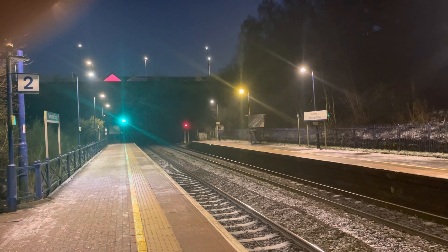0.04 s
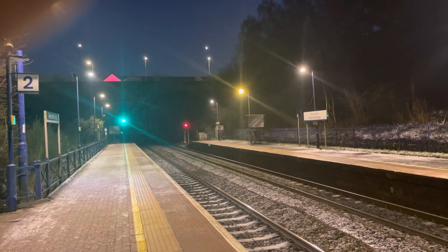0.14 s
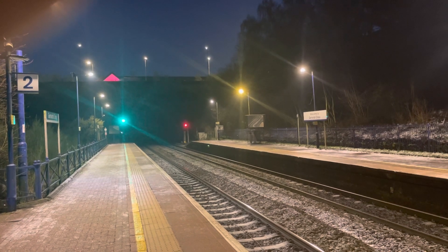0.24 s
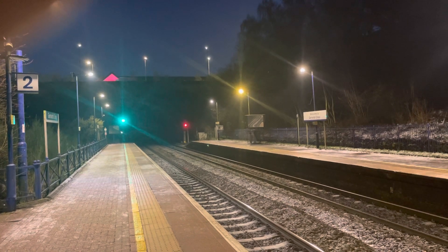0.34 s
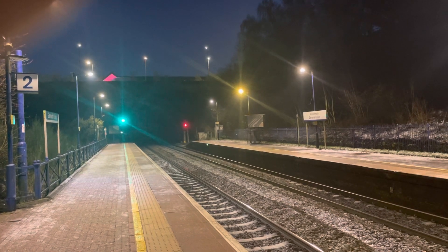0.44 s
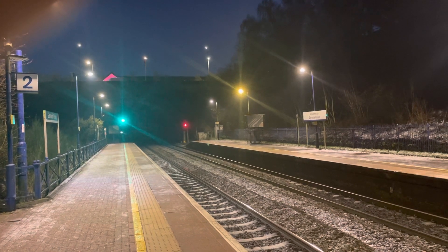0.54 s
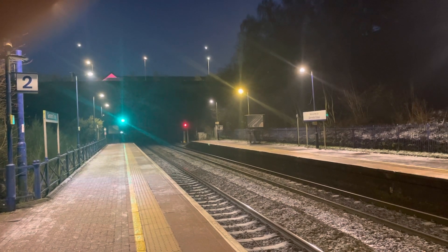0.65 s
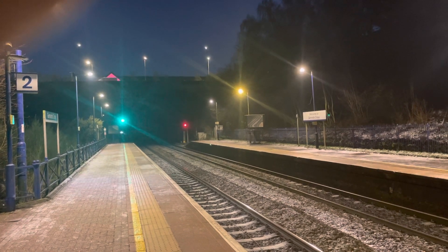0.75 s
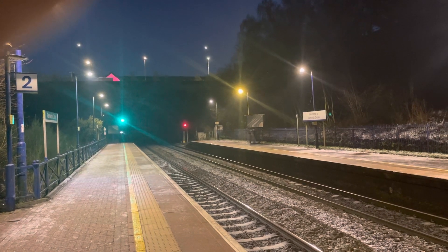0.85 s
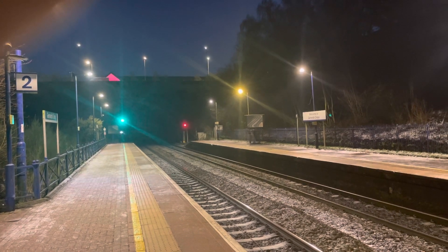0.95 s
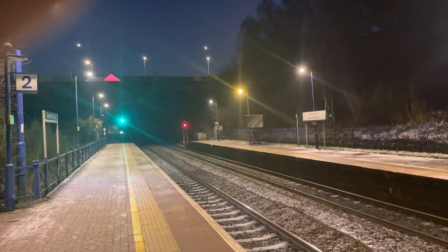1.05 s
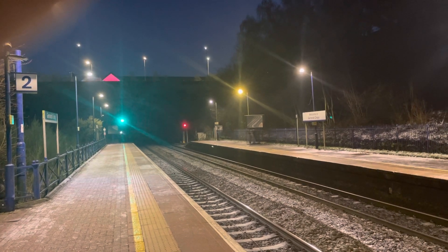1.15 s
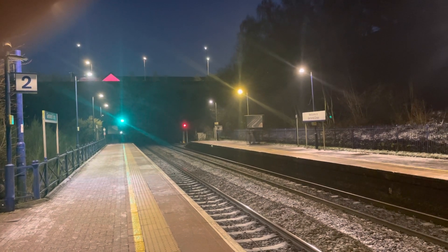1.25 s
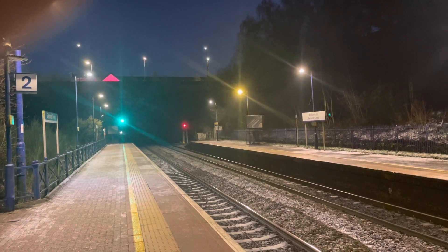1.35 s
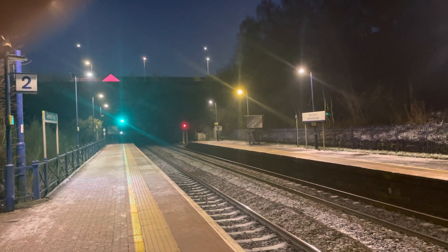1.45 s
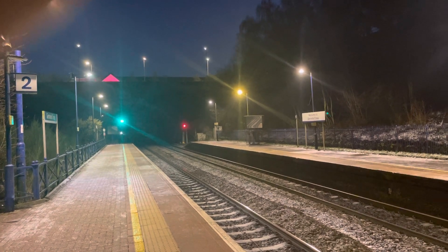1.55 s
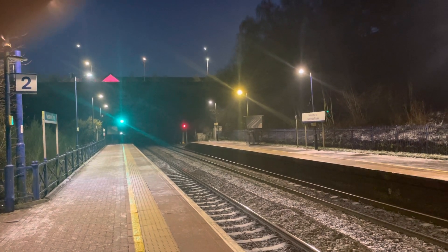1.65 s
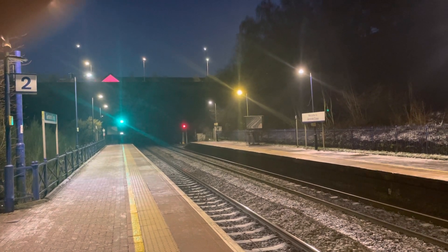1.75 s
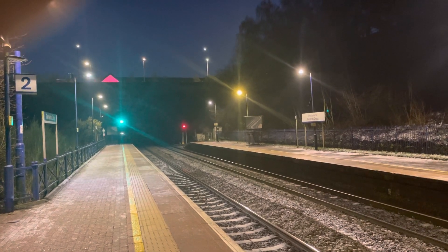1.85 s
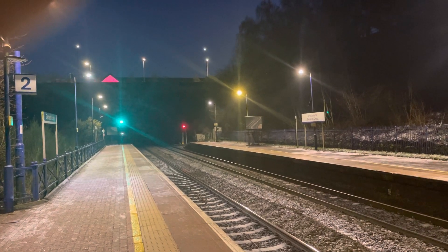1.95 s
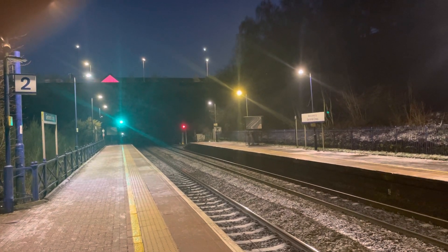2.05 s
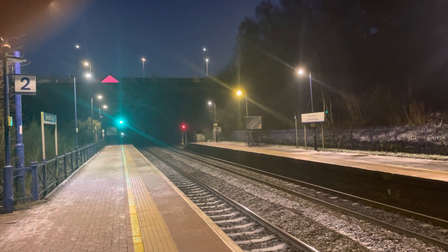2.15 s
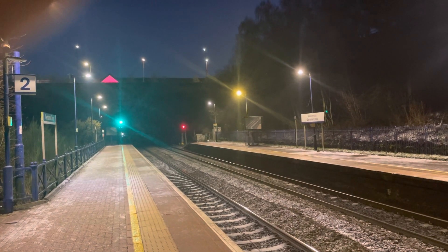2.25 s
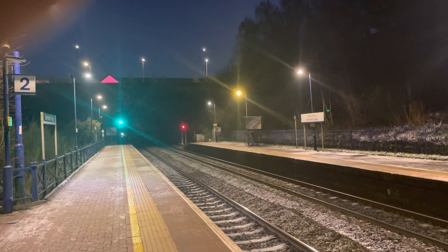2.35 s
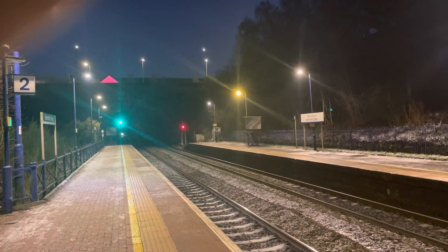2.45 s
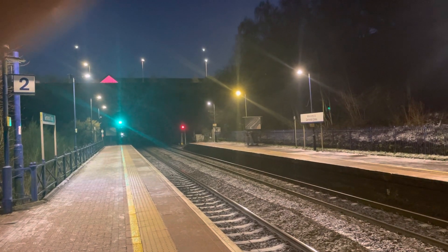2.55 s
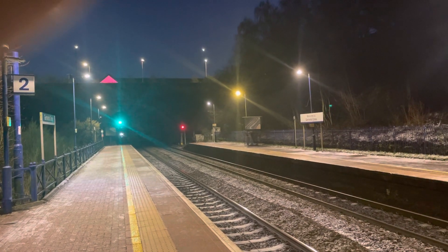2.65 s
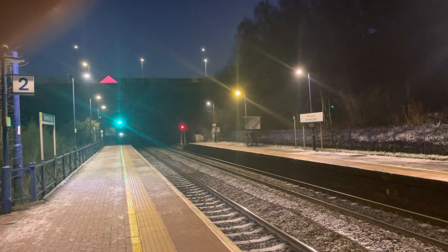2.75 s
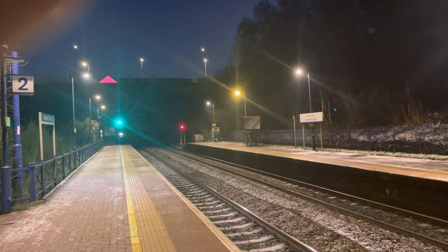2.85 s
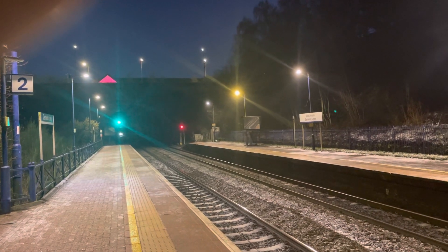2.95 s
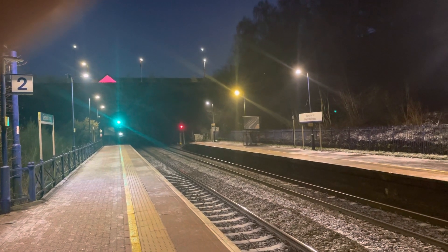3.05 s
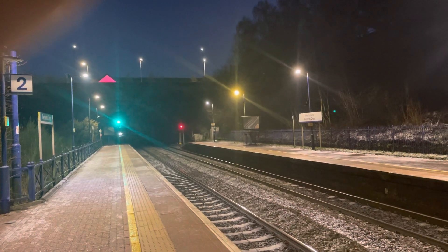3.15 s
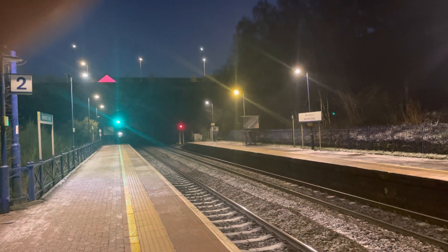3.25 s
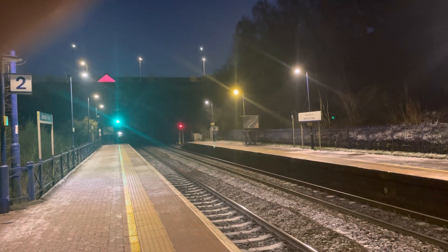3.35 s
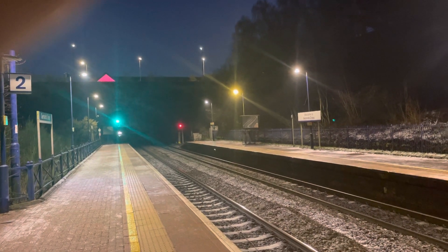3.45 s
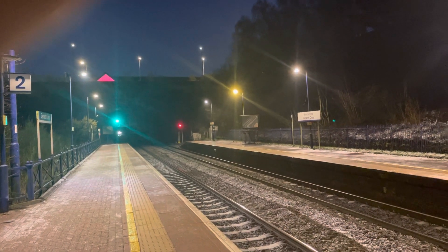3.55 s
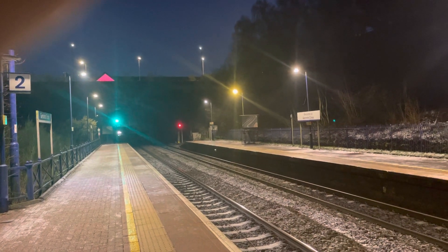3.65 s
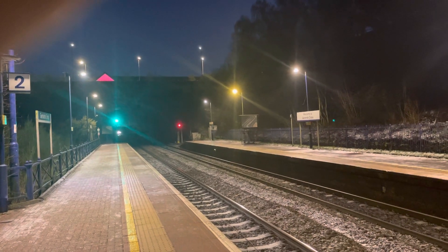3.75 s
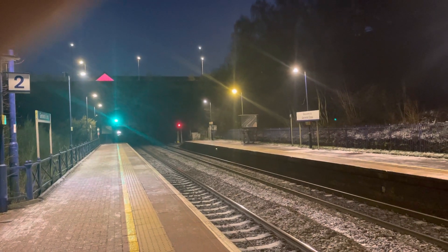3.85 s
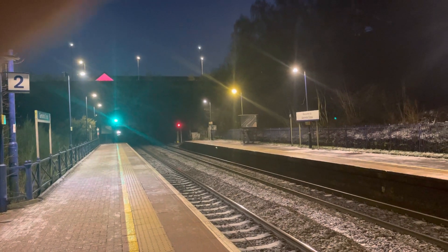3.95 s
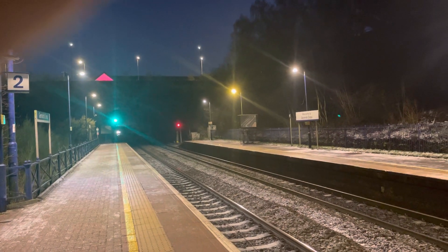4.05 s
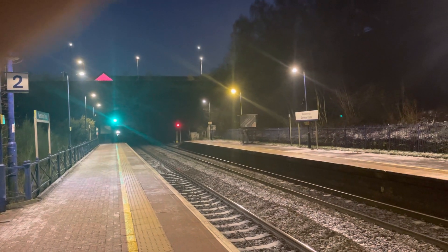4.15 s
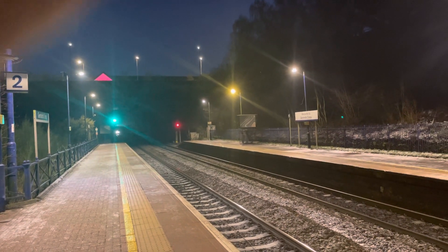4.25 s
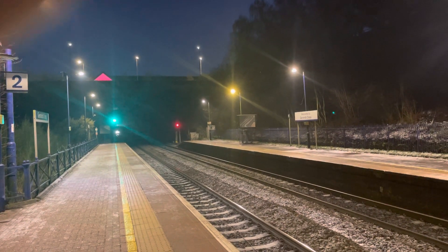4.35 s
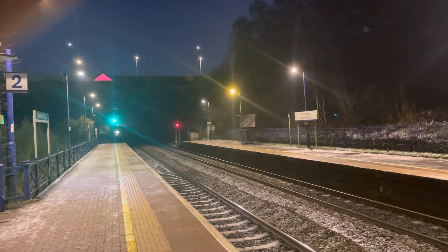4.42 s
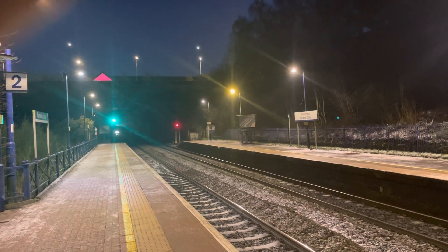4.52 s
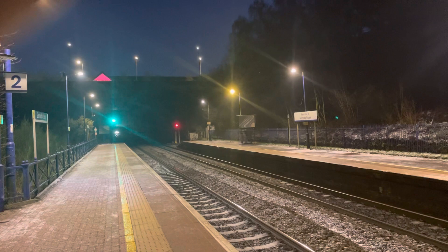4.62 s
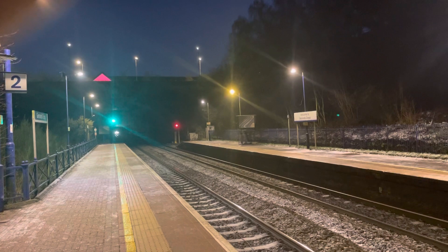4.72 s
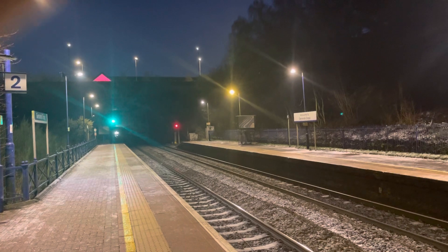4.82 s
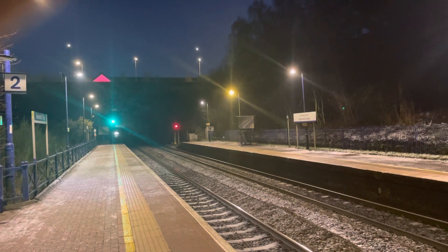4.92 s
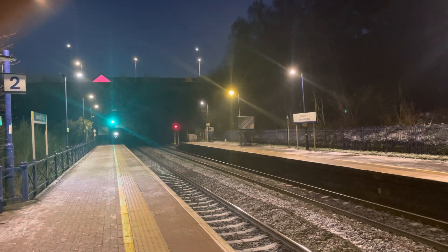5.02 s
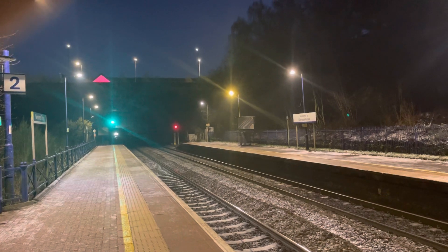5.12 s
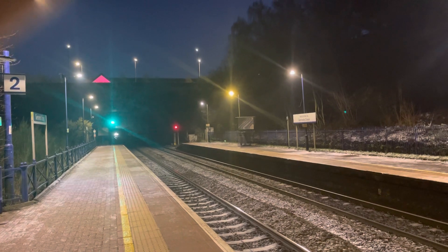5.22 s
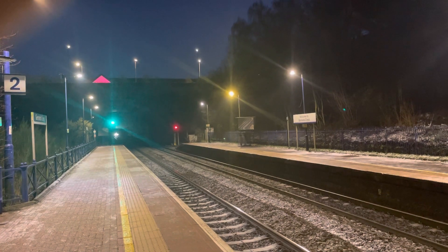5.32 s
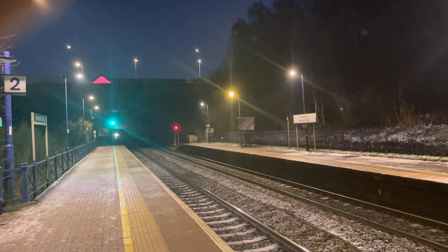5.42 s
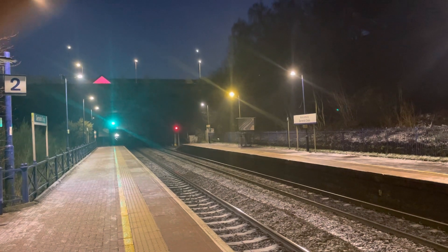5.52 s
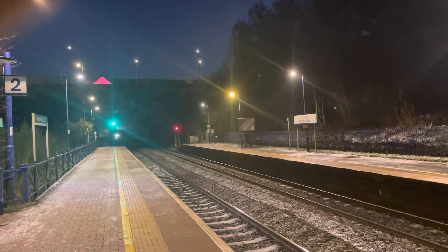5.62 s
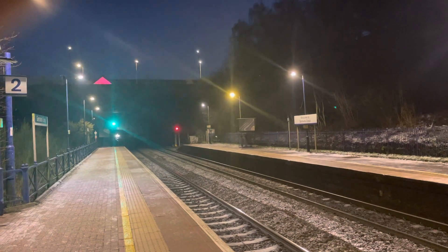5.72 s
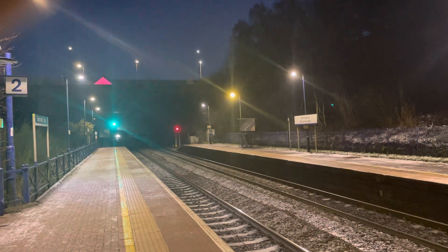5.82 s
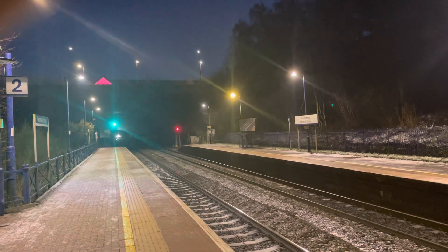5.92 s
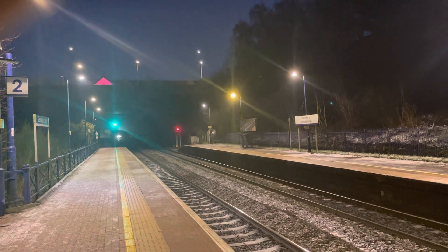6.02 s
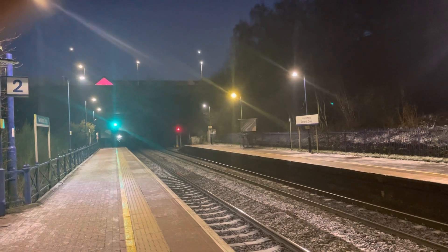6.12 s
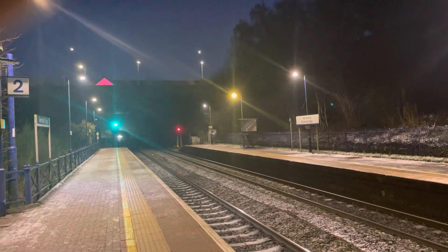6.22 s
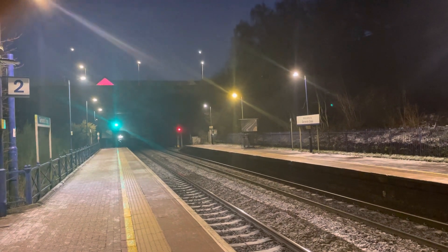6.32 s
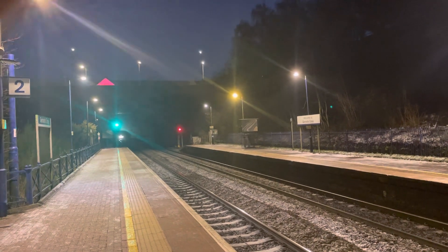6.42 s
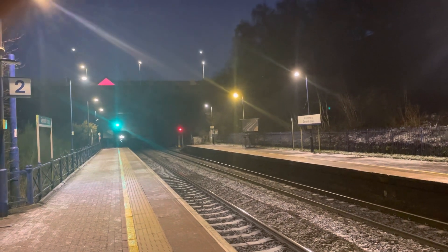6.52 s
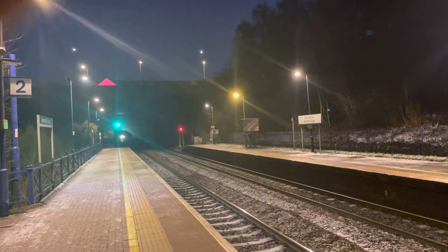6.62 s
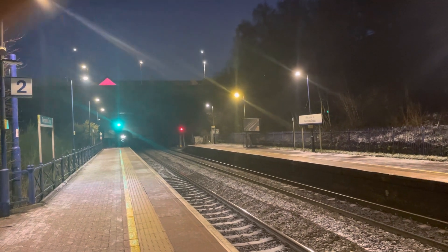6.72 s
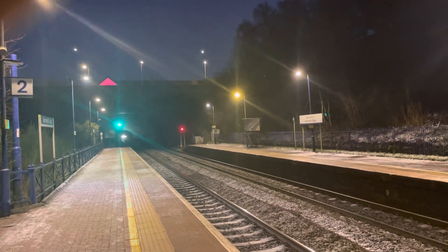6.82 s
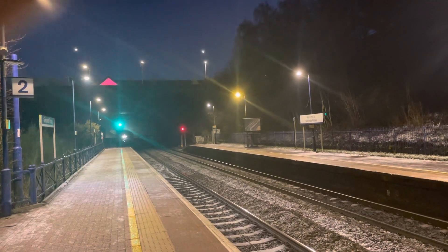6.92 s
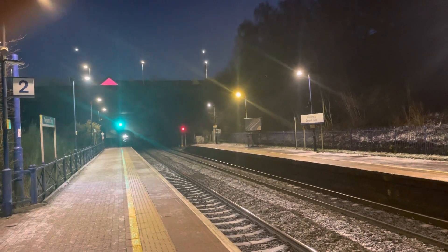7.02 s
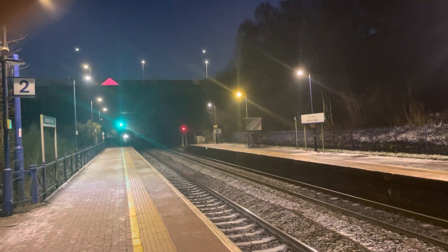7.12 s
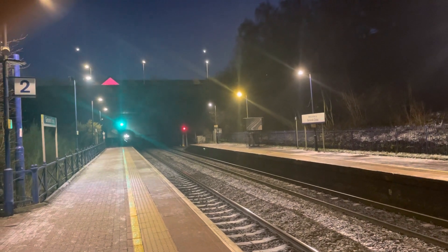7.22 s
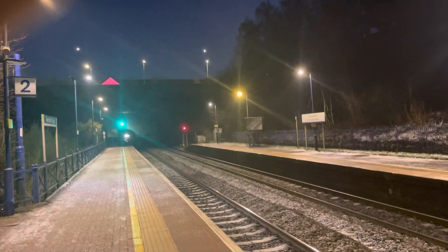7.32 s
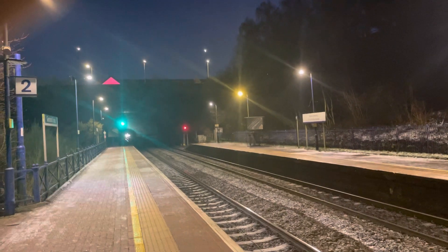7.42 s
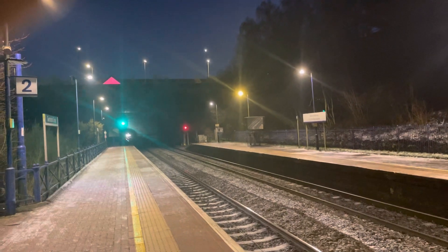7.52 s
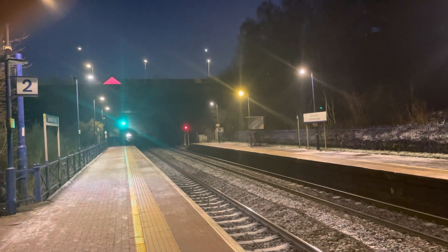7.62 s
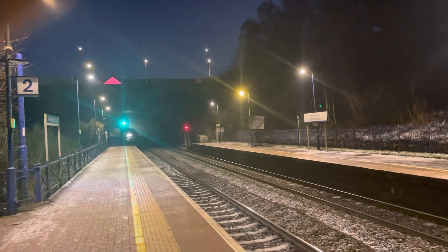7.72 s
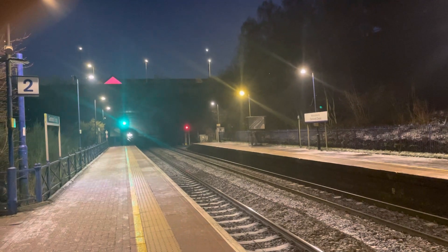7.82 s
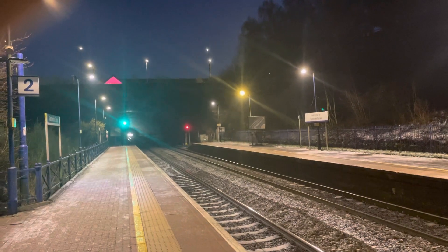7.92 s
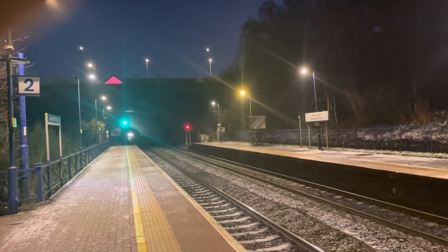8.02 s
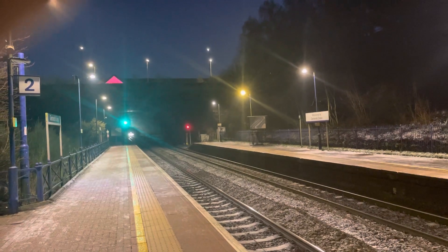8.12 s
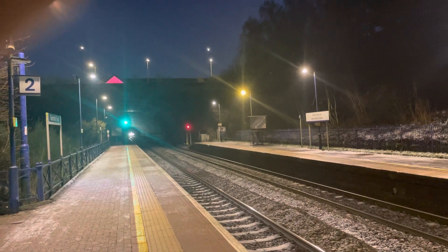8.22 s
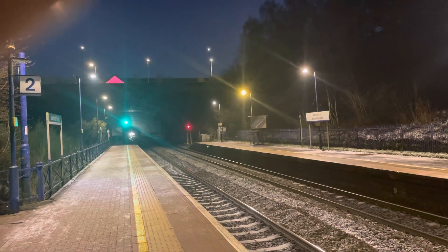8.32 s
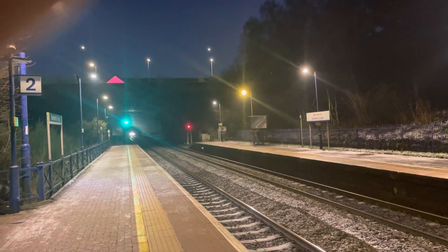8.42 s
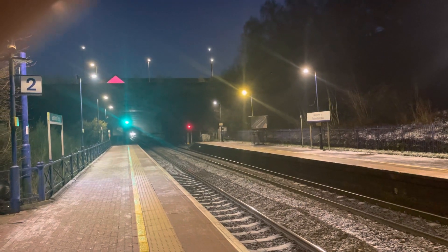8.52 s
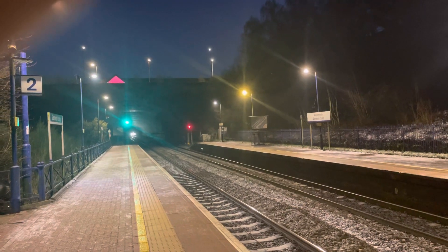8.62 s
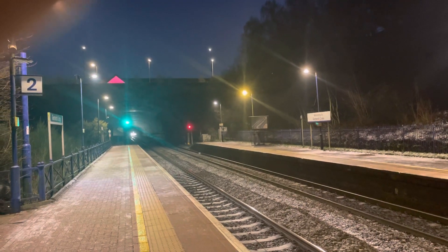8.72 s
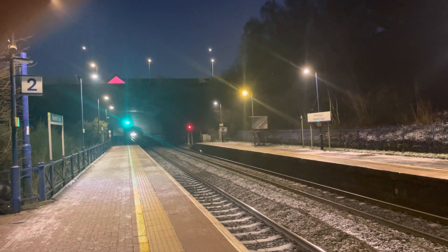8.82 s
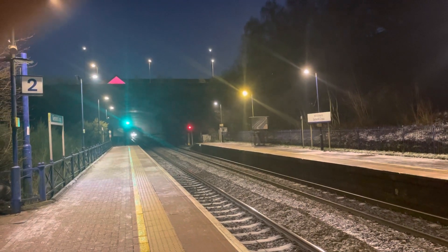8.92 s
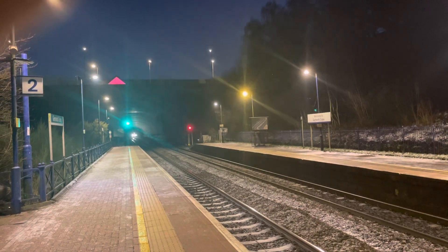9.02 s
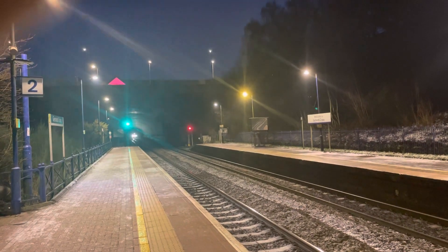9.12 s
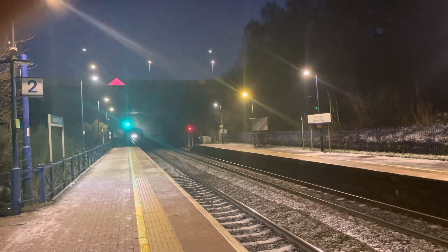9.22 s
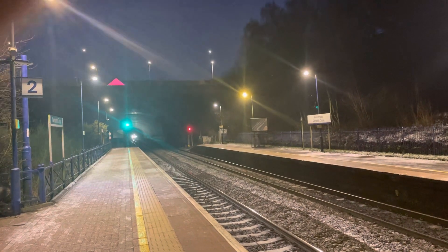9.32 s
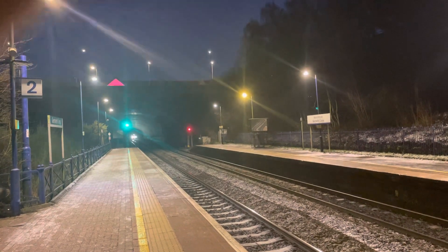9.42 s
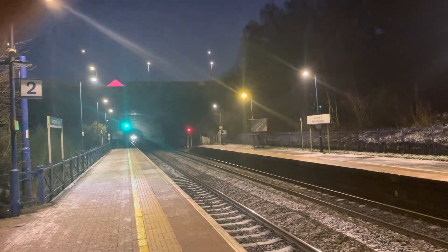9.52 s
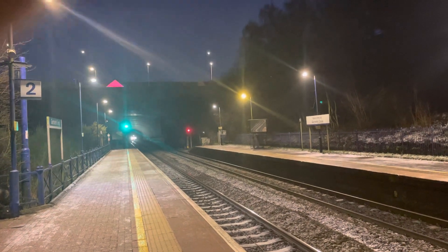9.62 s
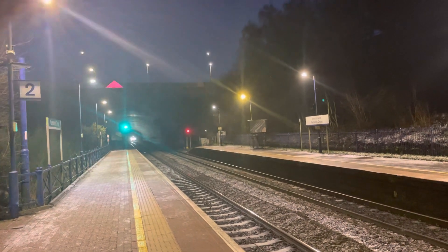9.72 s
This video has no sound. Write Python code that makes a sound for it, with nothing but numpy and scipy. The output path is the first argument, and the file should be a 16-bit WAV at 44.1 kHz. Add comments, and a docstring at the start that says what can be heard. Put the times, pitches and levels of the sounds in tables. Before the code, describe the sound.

A quiet night railway platform, heard in stereo from a fixed position. From 0 s a distant diesel locomotive holds a low, steady drone near 150 Hz over soft rumble, with a short burst of faint, echoing robin chirps until about 0.6 s. Far off, a road vehicle pulls away, its low engine note rising, changing gear around 3-4 s, rising again, then sinking after 7 s. Small dry ticks fall near 1, 2.8, 3.8, 4.5 and 7.3 s; a soft rustle peaks at 4.05 s beside a low sinking tone. From 4.3 s a faint, flickering gear whine gradually descends. Thin high whistles begin at 5.7 s, then quick robin phrases with smeared echoes continue intermittently to the end. A faint high tone passes 6.6-9 s. From 7.5 s wheel roar and hiss swell and brighten; the exhaust drone surges, throbbing and fluttering, loudest around 8.8 s, still approaching as it stops.

```python
"""Night at a station platform. From the start a robin sings in bursts (gliding sines, smeared echo patches), a road
vehicle pulls away far off (a firing tone per gear) and a locomotive drones far off (sines on engine orders).
Dry ticks (ringing modes) come from 1 s on; a low tone sinks from 3.7 s, a soft rustle (noise) peaks at 4.05 s,
a flickering gear whine enters near 4.3 s, and a tone near 1.4 kHz passes from 6.6 s.
Wheel roar (shaped noise) and exhaust swell as the train nears, most from about 7.5 s to the end."""
import sys
import numpy as np
from scipy import signal
from scipy.fft import rfft, irfft, next_fast_len
from scipy.io import wavfile
from scipy.ndimage import uniform_filter1d, map_coordinates

SR = 44100
rng = np.random.default_rng(int(sys.argv[2]) if len(sys.argv) > 2 else 0)


def output_pcm(signal):
    """Save a mono or channel-first signal as 16-bit PCM at the path in sys.argv[1].

    Samples are clipped to [-1, 1] before scaling.
    """
    pcm = np.clip(np.atleast_2d(signal).T, -1, 1) * 32767
    wavfile.write(sys.argv[1], SR, np.round(pcm).astype(np.int16))


N = 430416


def amp(db):
    """Decibels to gain."""
    return 10 ** (np.asarray(db) / 20)


def unit(x):
    """Scaled to rms 1."""
    return x / np.sqrt(np.mean(x ** 2) + 1e-20)


def along(points, hz):
    """Interpolates (frequency [Hz], value) points on a log frequency axis."""
    point_hz, value = np.transpose(points)
    return np.interp(np.log(hz + 1), np.log(point_hz + 1), value)


def curves(rows):
    """One value per sample for each column after the time."""
    time_s, *columns = np.transpose(rows)
    return [np.interp(np.arange(N) / SR, time_s, column) for column in columns]


def wobble(rate_hz):
    """A smooth random curve, rate_hz knots a second."""
    coarse = np.arange(0, N + 32, 32)
    knots = rng.standard_normal(int(N * rate_hz / SR) + 4)
    values = map_coordinates(knots, [coarse * rate_hz / SR])
    return np.interp(np.arange(N), coarse, values)


def filtered(x, response):
    """x through a complex response of frequency."""
    m = next_fast_len(N + SR // 2)
    gain = response(np.fft.rfftfreq(m, 1 / SR))
    return irfft(rfft(x, m) * gain, m)[..., :N]


def sine(hz, db, drift):
    """A tone of given rms level; its phase drifts slowly, as over a long path through moving air."""
    cycles = np.cumsum(hz * np.ones(N)) / SR + rng.random()
    phase = 2 * np.pi * cycles + drift * wobble(2.5)
    return np.sqrt(2) * amp(db) * np.sin(phase)


def passing(rows, drift):
    """A tone that fades in and out at the ends of its (time [s], frequency [Hz], level [dB]) table."""
    t = np.arange(N) / SR
    to_edge_s = np.minimum(t - rows[0][0], rows[-1][0] - t)
    gate = np.clip(to_edge_s / .15 + .5, 0, 1)
    return gate * sine(*curves(rows), drift)


def hiss(spectrum):
    """Smooth noise of rms 1, unrelated at the two sides."""
    return unit(filtered(rng.standard_normal((2, N)), lambda hz: amp(along(spectrum, hz))))


def band(hz, half_hz):
    """Noise of rms 1 in a band about a centre that may slide: slow noise moved up by a quadrature carrier."""
    slow = filtered(rng.standard_normal((2, N)), lambda f: 1 / (1 + (f / half_hz) ** 4))
    phase = 2 * np.pi * np.cumsum(hz * np.ones(N)) / SR
    return unit(slow[0] * np.cos(phase) + slow[1] * np.sin(phase))


# left-right likeness: (frequency [Hz], correlation [-])
LIKENESS = [(40, .85), (125, .94), (250, .88), (500, .94), (1000, .7), (1700, .6), (2400, .88), (4000, .25),
            (9000, .75)]


def rush(spectrum, patchy_db):
    """Stereo noise of rms 1: random gain patches in time and frequency, sides partly alike."""
    z = signal.stft(rng.standard_normal((2, N)), nperseg=512)[2]
    field = rng.standard_normal(z.shape[1:])
    field = uniform_filter1d(uniform_filter1d(field, 6, 0), 14, 1)
    pair = signal.istft(z * amp(patchy_db * unit(field)), nperseg=512)[1][:, :N]

    def mid_side(hz):
        turn = np.arccos(np.clip(along(LIKENESS, hz), -1, 1)) / 2
        return amp(along(spectrum, hz)) * [np.cos(turn), np.sin(turn)]

    mid, side = filtered(pair, mid_side)
    return unit(np.array([mid + side, mid - side]))


# faint hiss spectrum: (frequency [Hz], relative level [dB])
AIR_SPECTRUM = [(3000, -40), (4500, -0.5), (6000, -7), (7500, -10), (9000, -19), (12000, -11.5),
                (12600, -16.5)]


def air():
    """A very faint steady treble hiss: shaped noise, unrelated at the two sides."""
    return amp(-89.5) * hiss(AIR_SPECTRUM)


# firing tone, one table per gear: (time [s], frequency [Hz], level [dB])
ROAD_GEARS = [
    [(0.0, 44.5, -51.5), (1.25, 48.5, -52), (4.0, 70.06, -43.5)],
    [(2.6, 41.32, -53), (4.51, 56.63, -40), (6.63, 69.14, -44.5), (7.19, 67.3, -43), (9.76, 46.8, -36.5)],
]


def road_vehicle():
    """Far engine: one gliding firing tone per gear, each with unsteady level."""
    return sum(amp(2.3 * wobble(7)) * passing(gear, drift=0.6) for gear in ROAD_GEARS)


FALL_TO, FALL_SWELL_DB = .73, 8.5  # last pitch over first; growth during the fall
HOOK_SHARE, HOOK_SWELL_DB = .24, 10.5  # drop time constant over length; growth on landing
# levels are nominal: swell, thinning and shimmer act on them
# straight falls: (start [s], length [s], top [Hz], level at the end [dB])
ROBIN_FALLS = [(0.2, 0.028, 3800, -54), (6.197, 0.038, 4140, -47), (6.313, .024, 4240, -42.5),
               (6.365, 0.022, 4020, -60), (6.395, 0.014, 3650, -48), (6.486, 0.02, 3940, -41.5),
               (6.572, 0.02, 3880, -44.5), (6.953, .014, 3880, -48), (7.053, 0.03, 4000, -44.5),
               (9.705, 0.026, 5030, -48)]
# fast drops that level off: (start [s], length [s], top [Hz], landing [Hz], landed level [dB])
ROBIN_HOOKS = [(0.073, 0.048, 4800, 3280, -55), (0.128, 0.024, 3700, 3420, -51.5),
               (0.171, 0.034, 3880, 3484, -46), (0.49, 0.016, 4600, 4370, -61),
               (6.188, 0.02, 5830, 5300, -60), (7.001, 0.04, 4450, 4020, -46.5),
               (7.231, .028, 3010, 2710, -53), (7.271, 0.037, 3200, 2745, -50.5),
               (8.168, 0.024, 7380, 6290, -41), (8.488, 0.024, 4750, 3250, -54),
               (8.54, 0.019, 5000, 3340, -46.5), (8.746, .02, 4620, 3180, -50),
               (8.787, 0.026, 4870, 3150, -44.5)]
# turning notes: (start [s], length [s], turn point [share of length], first [Hz], turn [Hz], last [Hz], level [dB])
ROBIN_TURNS = [(0.29, 0.044, .3, 3490, 3250, 3880, -56), (6.147, 0.034, 0.61, 3940, 4450, 3300, -50.5),
               (6.914, 0.028, 0.32, 4620, 3500, 3730, -52.5), (7.435, 0.033, 0.57, 2940, 3400, 2970, -47),
               (7.469, 0.046, 0.6, 2946, 3350, 2750, -46), (7.954, 0.023, 0.6, 7200, 5700, 6720, -54.5),
               (8.145, 0.023, .5, 6850, 5150, 6650, -50.5), (8.522, 0.02, 0.42, 4040, 5650, 4900, -55.5),
               (9.587, 0.02, 0.43, 4420, 4550, 5800, -53)]
# level whistles: (start [s], length [s], pitch [Hz], level [dB])
ROBIN_WHISTLES = [(5.663, 0.15, 8700, -62.5), (5.83, 0.1, 8560, -58.5), (5.953, 0.033, 8700, -56.5),
                  (6.006, 0.052, 8650, -54.5), (6.327, 0.051, 4030, -53), (6.404, 0.041, 4040, -55),
                  (6.529, 0.018, 4120, -54), (7.081, 0.032, 3290, -48.5), (7.111, 0.074, 3380, -45.5),
                  (7.386, 0.018, 2754, -52.5), (7.672, 0.038, 3560, -59), (7.765, 0.039, 3500, -60),
                  (8.133, 0.017, 7900, -52), (7.977, 0.12, 6440, -48), (8.57, 0.023, 4390, -47.5),
                  (8.831, 0.037, 3400, -52), (9.615, 0.024, 5590, -52), (9.677, 0.014, 5570, -55),
                  (9.693, 0.01, 4500, -46)]
# smeared, wavering echo patches, noisy bands: (start [s], length [s], centre [Hz], spread [Hz], level [dB])
ECHO_PATCHES = [(0.0, 0.065, 5300, 420, -57), (0.0, 0.045, 6900, 480, -50), (0.24, 0.06, 3300, 200, -53),
                (0.335, 0.085, 3870, 90, -55), (0.355, 0.25, 4930, 178, -63.5),
                (0.505, 0.12, 4450, 90, -63), (6.175, 0.085, 4330, 130, -50), (6.23, 0.07, 5350, 300, -62),
                (6.29, 0.33, 4130, 110, -56), (6.925, 0.085, 4700, 300, -59), (7.059, 0.08, 4100, 130, -49),
                (8.19, 0.06, 5350, 200, -55), (8.195, 0.075, 6700, 450, -49), (8.555, 0.09, 4900, 480, -57),
                (9.64, 0.1, 5100, 450, -58)]


def notes():
    """Each kind of note or patch has its own pitch rule: yields start [s], pitch per sample [Hz], level [dB]."""
    clock = lambda length: np.arange(round(length * SR)) / SR
    waver = 1.6 * np.tanh(wobble(600) / 1.2)
    for s, length, top, db in ROBIN_FALLS:
        done = clock(length) / length
        yield s, top * (1 - (1 - FALL_TO) * done), db - FALL_SWELL_DB * (1 - done)
    for s, length, top, landing, db in ROBIN_HOOKS:
        height = np.exp(-clock(length) / (HOOK_SHARE * length))
        yield s, landing + (top - landing) * height, db - HOOK_SWELL_DB * height
    for s, length, share, first, turn, last, db in ROBIN_TURNS:
        yield s, np.interp(clock(length) / length, [0, share, 1], [first, turn, last]), db
    for s, length, hz, db in ROBIN_WHISTLES:
        yield s, hz + 0 * clock(length), db
    for s, length, hz, spread, db in ECHO_PATCHES:
        yield s, hz + spread * waver[round(s * SR):][:len(clock(length))], db


CARRY_HZ, THINS_DB_PER_OCTAVE = 3400, 17  # higher pitches arrive weaker
EDGE_S, QUAVER_HZ, SHIMMER_DB = 0.0034, 49.7, 3  # note fades; scales of pitch and level unsteadiness
ECHO_DB, ECHO_T60_S, ECHO_DULL_HZ = 2, 0.65, 6000  # leaves soak up the echo above ECHO_DULL_HZ
BANK_S, BANK_DB = 0.056, 2  # delay and extra level of the echo off a far bank


def robin():
    """Whistles and wavering echo patches; trunks and walls return a long smeared echo, different at each side."""
    song = np.zeros(N + SR)
    quaver = QUAVER_HZ * np.pad(wobble(90), (0, SR))
    for start, hz, db in notes():
        at, t = round(start * SR), np.arange(len(hz)) / SR
        edges = np.sin(np.pi / 2 * np.clip(np.minimum(t, t[-1] - t) / EDGE_S, 0, 1)) ** 2
        thin_db = THINS_DB_PER_OCTAVE * np.log2(np.maximum(hz / CARRY_HZ, 1))
        phase = 2 * np.pi * np.cumsum(hz + quaver[at:][:len(t)]) / SR
        song[at:][:len(t)] += amp(db - thin_db) * edges * np.sin(phase)
    song[:N] *= amp(SHIMMER_DB * wobble(110))  # unsteady over the long path
    t = np.arange(SR) / SR
    tail = rng.standard_normal((2, SR)) * amp(-60 * t / ECHO_T60_S + BANK_DB * (t > BANK_S))
    echo = signal.fftconvolve(song[None], tail / np.linalg.norm(tail[0]), axes=1)[:, :N]
    dull_echo = filtered(echo, lambda hz: 1 / np.sqrt(1 + (hz / ECHO_DULL_HZ) ** 4))
    return song[:N] + amp(ECHO_DB) * dull_echo


SNAP_RISE_S, BODY_RISE_S = .0004, .0004
# clicks: (time [s], snap gain [dB], body gain [dB])
TICK_TIMES = [(1.0074, -49.5, -29), (1.044, -58.5, -33.5), (2.805, -36, -26.5), (3.798, -57, -35),
              (4.5072, -34, -26.5), (7.3023, -53, -22)]
# snap modes: (frequency [Hz], relative level [dB], t60 [s])
SNAP_MODES = [(1720, -6.5, .012), (2500, -9.5, .003), (3320, -1.5, .004), (4670, -9.5, .003),
              (6400, -15, 0.0041)]
# body modes: (frequency [Hz], relative level [dB], t60 [s])
BODY_MODES = [(600, -4.5, 0.01), (870, 2.5, 0.0053), (1210, -5.5, 0.0043), (1480, -9.5, 0.0046)]


def ticks():
    """Small dry clicks close by: decaying modes, a snap over a dull body, mode levels varied at random."""
    out, t = np.zeros((2, N + SR)), np.arange(SR // 20) / SR

    def ring(modes):
        return sum(amp(db + rng.normal(0, 1.3) - 60 * t / t60) * np.sin(2 * np.pi * hz * t)
                   for hz, db, t60 in modes)

    for s, snap_db, body_db in TICK_TIMES:
        snap = amp(snap_db) * (1 - np.exp(-t / SNAP_RISE_S)) * ring(SNAP_MODES)
        body = amp(body_db) * (1 - np.exp(-t / BODY_RISE_S)) * ring(BODY_MODES)
        out[:, round(s * SR):][:, :len(t)] += snap + body
    return out[:, :N]


RUSTLE_S, RUSTLE_DB, RUSTLE_WIDTH_S = 4.05, -56, 0.1  # middle; peak; time to fade by 6 dB
# rustle spectrum: (frequency [Hz], relative level [dB])
RUSTLE_SPECTRUM = [(800, -40), (1300, -4), (2000, 0), (3500, -12), (5500, -28), (9000, -50)]


def rustle():
    """One soft rustle: shaped noise under a bell envelope."""
    offset = (np.arange(N) / SR - RUSTLE_S) / RUSTLE_WIDTH_S
    return amp(RUSTLE_DB - 6 * offset ** 2) * hiss(RUSTLE_SPECTRUM)


# tone near 1.4 kHz: (time [s], frequency [Hz], level [dB])
HIGH_TONE = [(6.6, 1410, -70), (6.75, 1414, -60.5), (7.4, 1402, -60.5), (8.15, 1394, -65), (8.5, 1433, -60),
             (8.88, 1413, -51.5), (9.05, 1414, -71)]
# low sinking tone: (time [s], frequency [Hz], level [dB])
LOW_TONE = [(3.7, 263, -45), (4.4, 258, -52), (5.3, 247.6, -49.5)]


def passing_tones():
    """Two sines with drifting phase that come and go: a nearly level one and a low one that sinks."""
    return passing(HIGH_TONE, drift=0.29) + passing(LOW_TONE, drift=.7)


# how far the train has come out of the distance: (time [s], gain [dB])
TRAIN_NEARNESS = [(0, -1.5), (1.5, 0.5), (4, 5), (5.8, 6), (7.5, 11), (8.7, 18), (9.76, 22)]
# mean level at 0 dB nearness; dB gained per dB of nearness
RUMBLE_DB, RUMBLE_GROWS = -40, 0.43
ROAR_DB, ROAR_GROWS = -57, 0.81
HISS_DB, HISS_GROWS = -66.5, 1.015
FAR_ROAR_DB = -55  # floor of the roar, independent of nearness
# noise spectra: (frequency [Hz], relative level [dB])
RUMBLE_SPECTRUM = [(20, -33.5), (40, 1), (70, 5), (130, 4.5), (200, 3), (280, -1.5), (380, -3), (520, -8.5),
                   (700, -17), (900, -80)]
ROAR_SPECTRUM = [(400, -38), (600, -0.5), (850, 3.5), (1100, -3), (1200, -6.5), (1500, -6), (1750, -8.5),
                 (2000, -59)]
HISS_SPECTRUM = [(1000, -33), (1700, -7), (1770, -0.5), (2030, -0.5), (2460, -3), (2850, -2.5), (3640, -16),
                 (3960, -24), (4210, -23.5), (5470, -57), (9260, -120)]
SIZZLE_SPECTRUM = [(2600, -41), (3200, -0.5), (3850, -11), (4400, -9), (5500, -23.5), (7000, -62)]
# high sizzle: (time [s], mean level [dB])
SIZZLE_CURVE = [(0, -87.5), (1.5, -87), (2.5, -74.5), (4.3, -76), (5.5, -87.5), (7.8, -80), (8.8, -64.5),
                (9.76, -64)]


def rolling():
    """Wheels on rails and engine casing: noise bands sharing a swell, brighter as the train nears."""
    near_db, swell = curves(TRAIN_NEARNESS)[0], wobble(3)
    rumble = amp(RUMBLE_DB + RUMBLE_GROWS * near_db + 0.14 * swell) * rush(RUMBLE_SPECTRUM, patchy_db=2.0)
    roar_gain = np.hypot(amp(ROAR_DB + ROAR_GROWS * near_db), amp(FAR_ROAR_DB))
    roar = roar_gain * amp(.5 * swell) * rush(ROAR_SPECTRUM, patchy_db=1.1)
    high = amp(HISS_DB + HISS_GROWS * near_db + .5 * swell) * rush(HISS_SPECTRUM, patchy_db=1.0)
    sizzle = amp(curves(SIZZLE_CURVE)[0] + swell) * hiss(SIZZLE_SPECTRUM)
    return rumble + roar + high + sizzle


WHINE_START_HZ, WHINE_SINKS_HZ_PER_S, WHINE_BLUR_HZ = 1590, 36.7, 3
# whine fading in and out: (time [s], mean level [dB])
WHINE_LEVEL = [(4.3, -72.5), (4.8, -70), (5.1, -69), (5.25, -56), (5.5, -69.5), (5.75, -56.5),
               (5.95, -68.5), (6.25, -58), (6.45, -67), (6.6, -57), (7.0, -61), (7.5, -64.5), (7.75, -57),
               (8.1, -60), (8.25, -55), (8.7, -61.5), (9.15, -51.5), (9.45, -57.5), (9.65, -51)]


def whine():
    """A gear whine that sinks steadily as the train slows; moving air makes it flicker and blur."""
    t = np.arange(N) / SR
    hz = WHINE_START_HZ - WHINE_SINKS_HZ_PER_S * t + WHINE_BLUR_HZ * wobble(25)
    return sine(hz, curves(WHINE_LEVEL)[0] + 3 * wobble(16), drift=0.75)


# low band: (time [s], level [dB])
BOOM_LEVEL = [(0.0, -51.5), (2.83, -50), (3.31, -48.5), (4.38, -39.5), (5.93, -34.5), (6.14, -44),
              (6.22, -36), (9.54, -39), (9.76, -38.5)]
# its centre: (time [s], frequency [Hz])
BOOM_CENTRE = [(0, 115), (4.4, 120), (5.5, 111), (6.3, 98), (8.4, 92), (9.76, 90)]
# turbulence about the ninth order: (time [s], level [dB])
FLUTTER_LEVEL = [(0, -57), (6, -46), (8.2, -44.5), (8.6, -26.5), (9.76, -28)]


def boom():
    """Turbulent exhaust gas: a low noise band that slides, and a flutter that blurs the drone close by."""
    low = amp(curves(BOOM_LEVEL)[0]) * band(curves(BOOM_CENTRE)[0], half_hz=8.8)
    flutter = amp(curves(FLUTTER_LEVEL)[0]) * band(148, half_hz=28.8)
    return low + flutter


CYCLE_HZ = 16.66  # engine cycles a second
SEVENTH_DB = -49  # mean level of order 7
UPPER_DB, UPPER_GROWS, UPPER_FADES_DB = -67, 0.85, 3  # orders 16-23: level at 0 dB nearness, dB per dB, fading
# order 9, the strongest: (time [s], level [dB])
NINTH_LEVEL = [(0.0, -38), (0.19, -37.5), (1.19, -32), (4.1, -32.5), (5.33, -35.5), (5.6, -39.5),
               (5.84, -35.5), (5.98, -44.5), (6.33, -37), (8.16, -22), (8.29, -24.5), (8.78, -15.5),
               (8.86, -25.5), (9.21, -18), (9.43, -21), (9.71, -22), (9.76, -29.5)]
# its neighbours: (time [s], order 8 [dB], order 10 [dB], order 11 [dB], order 12 [dB])
NEIGHBOUR_LEVELS = [(0.0, -48.5, -50, -42, -75.5), (1.82, -45, -65, -49.5, -48),
                    (2.77, -42.5, -59, -41, -45.5), (6.63, -54, -44.5, -35, -41.5),
                    (9.05, -30, -36.5, -29, -52), (9.76, -32, -26.5, -35, -55)]
# orders that follow the twelfth: (order [-], mean level re order 12 [dB])
FAINT_ORDERS = [(13, -7.5), (15, -10)]


def exhaust():
    """Uneven cylinders put a line on each order of the cycle; the silencer passes those near the ninth."""
    eighth_db, tenth_db, eleventh_db, twelfth_db = curves(NEIGHBOUR_LEVELS)
    near_db = curves(TRAIN_NEARNESS)[0]
    drone = sine(9 * CYCLE_HZ, curves(NINTH_LEVEL)[0], drift=0.74)
    drone += sine(7 * CYCLE_HZ, SEVENTH_DB + 3 * wobble(2.6), drift=0.23)
    for order, db in zip((8, 10, 11, 12), (eighth_db, tenth_db, eleventh_db, twelfth_db)):
        drone += sine(order * CYCLE_HZ, db, drift=.25)
    for order, db in FAINT_ORDERS:
        drone += sine(order * CYCLE_HZ, twelfth_db + db + 3 * wobble(1.5), drift=0.24)
    for order in range(16, 24):
        upper_db = UPPER_DB + UPPER_GROWS * near_db + UPPER_FADES_DB * wobble(5.5)
        drone += sine(order * CYCLE_HZ, upper_db, drift=1.5)
    return drone + sine(24 * CYCLE_HZ, eleventh_db - 18 + 2 * wobble(1.5), drift=.4)


# level, left over right: (frequency [Hz], level [dB])
PORT_LEVEL = [(60, -2.5), (95, -4.5), (150, -2.5), (240, -2.5), (380, 1), (600, 0.5), (950, 4.5),
              (1500, 2.5), (2370, 2), (3760, 0.5)]
# phase, left minus right: (frequency [Hz], phase [rad])
PORT_PHASE = [(100, 0), (520, .6), (1200, .8), (1550, -1.7), (1810, -2.7), (2200, -.1), (3200, .6)]


def scene():
    """Train and road reach two microphone ports with level and phase offsets, each from its own table."""
    tones = road_vehicle() + passing_tones() + whine() + boom() + exhaust()
    half = np.array([[.5], [-.5]])  # left, right

    def ports(hz):
        level_db = half * along(PORT_LEVEL, hz)
        phase_rad = half * along(PORT_PHASE, hz)
        return amp(level_db) * np.exp(1j * phase_rad)

    far = filtered(tones + rolling(), ports)
    return air() + robin() + ticks() + rustle() + far


CLOCK_HZ, TOP_HZ = 12000, 12640  # converter clock; band limit


def record(dry):
    """The converter's clock leaks a faint image of the sound about its own frequency; a band limit cuts the top."""
    clock = np.cos(2 * np.pi * CLOCK_HZ * np.arange(N) / SR)
    image = amp(-64) * clock * dry.mean(0)
    return filtered(dry + image, lambda hz: hz < TOP_HZ)


dry = scene()
out = record(dry)
output_pcm(out)
```